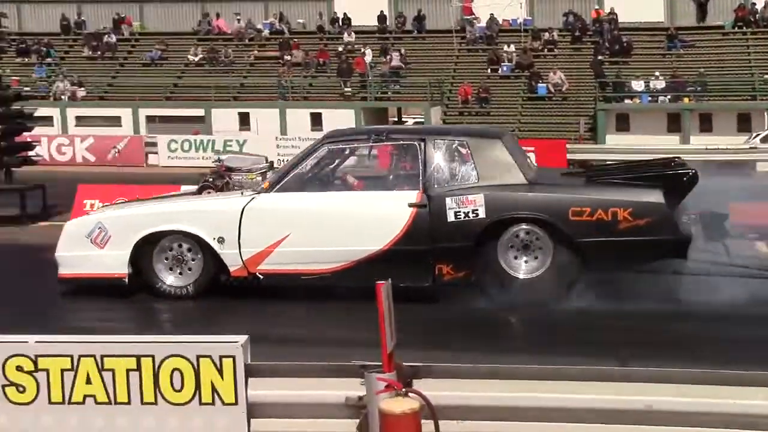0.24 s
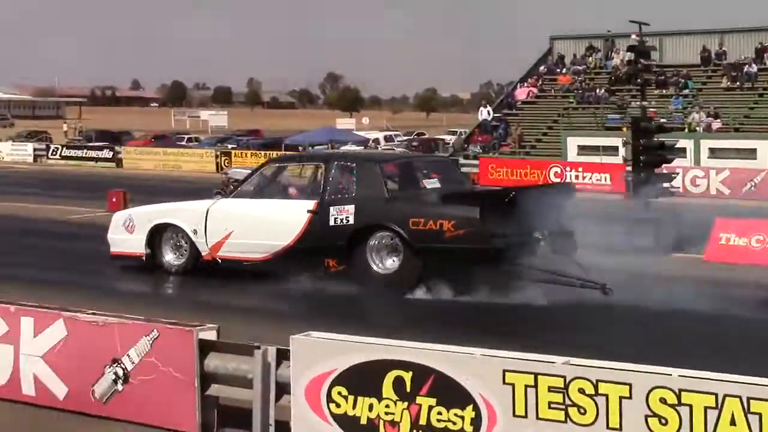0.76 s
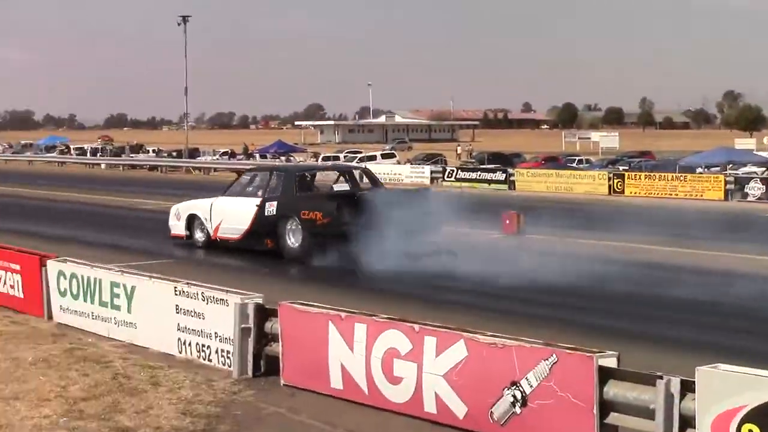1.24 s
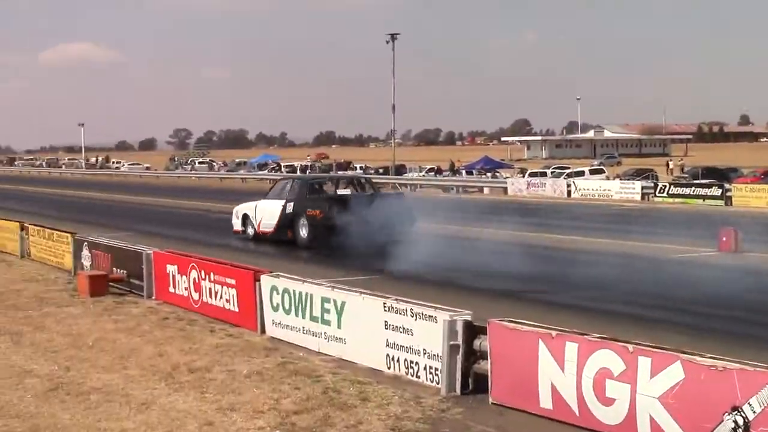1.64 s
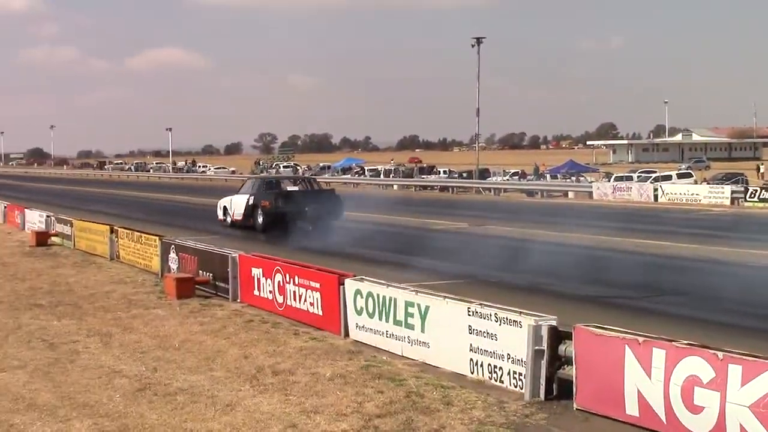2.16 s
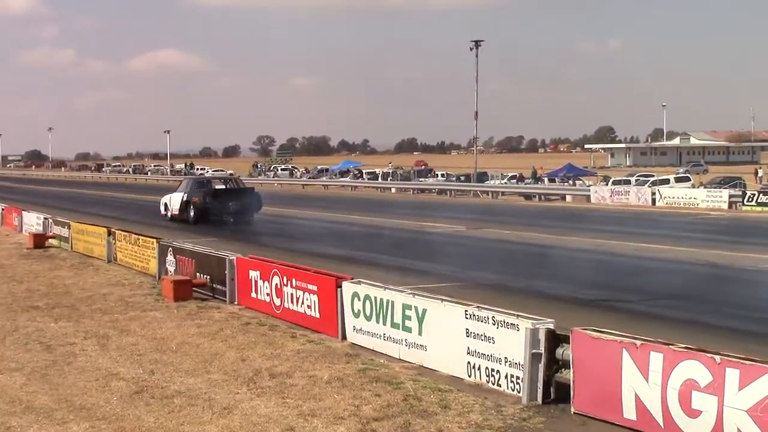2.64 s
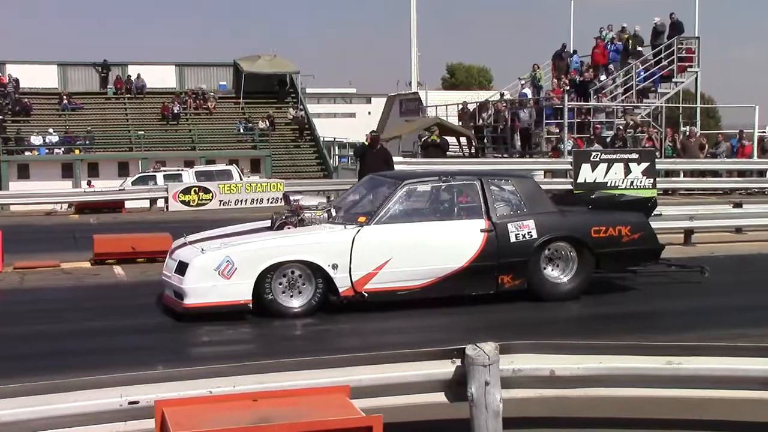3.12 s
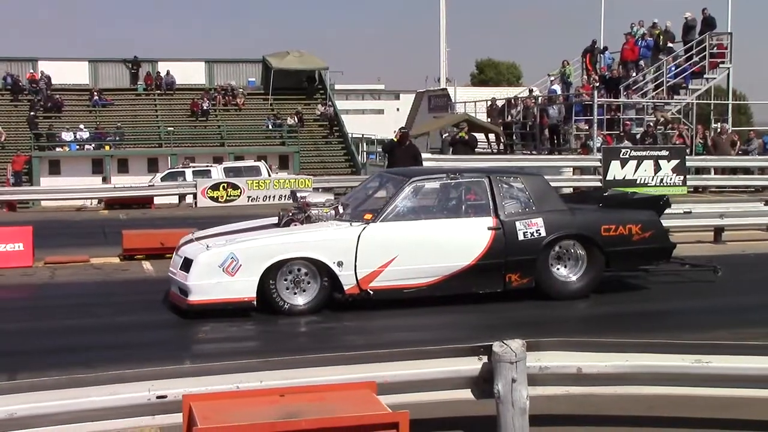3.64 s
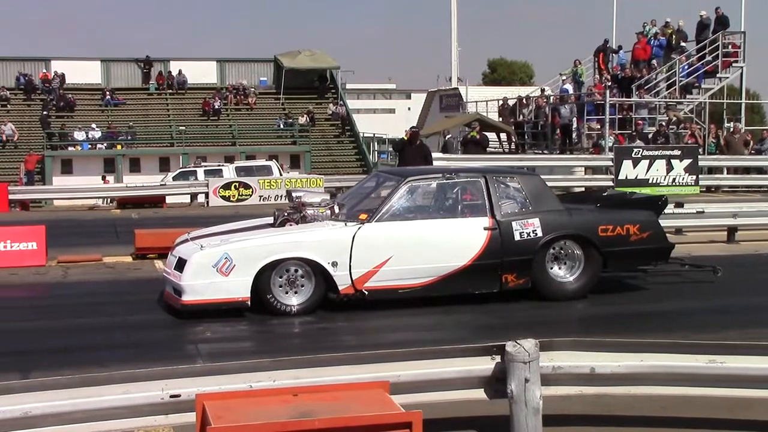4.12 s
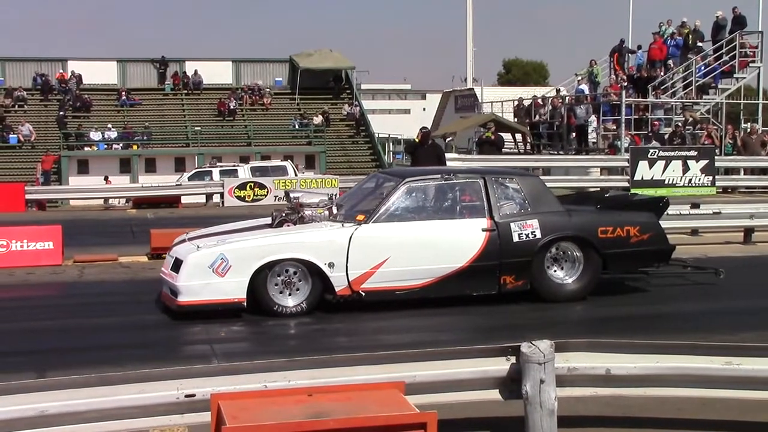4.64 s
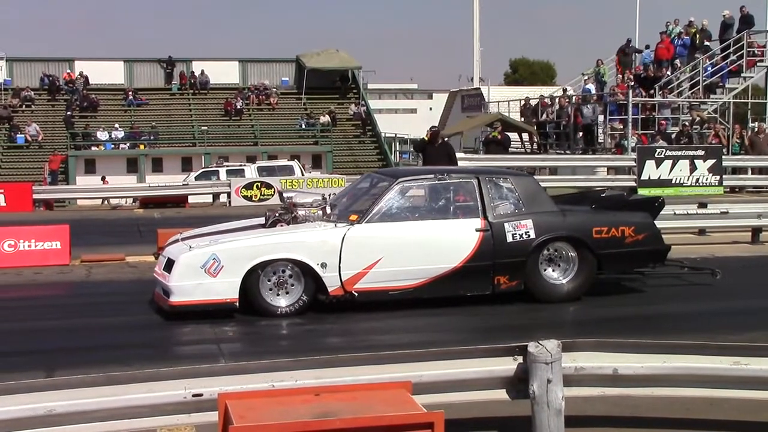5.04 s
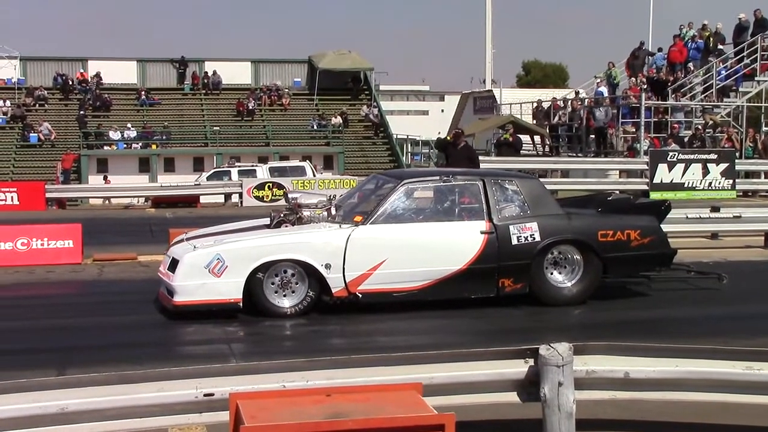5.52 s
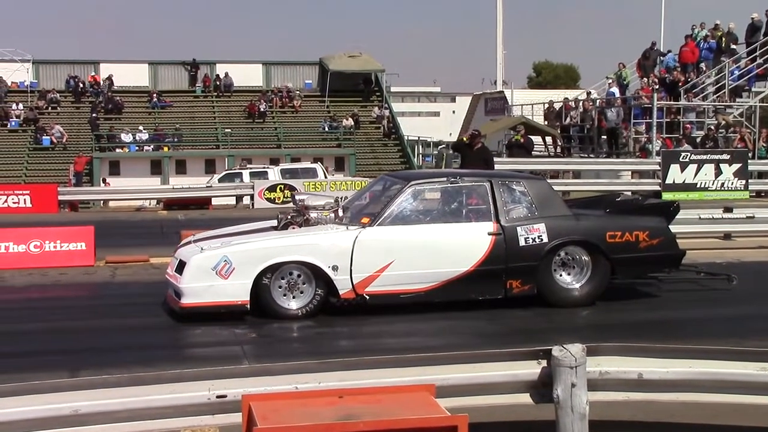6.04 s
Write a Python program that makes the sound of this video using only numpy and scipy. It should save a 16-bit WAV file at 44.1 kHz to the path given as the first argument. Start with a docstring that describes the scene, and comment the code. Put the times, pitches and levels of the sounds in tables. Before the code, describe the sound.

A racing engine at full throttle starts very close and loud, its pitch sagging slightly as it drives away. It lifts off; the echo dies quickly, leaving far-off crackles, two soft throttle swells and a slight rubber chirp. Then, suddenly near again, it idles roughly: rapid uneven barks and spits of gas over a low boom, valve clatter and whirr, with open-air reflections from the stands.

```python
"""Drag car: full-throttle run and loping idle

A V8 drag car with open headers spins its tyres past a trackside microphone, lifts off and crackles away.
Engine orders and coloured noise make the roar, gated bursts the pops, and gliding sines the tyre squeals.
At 3 s the scene cuts to the same car idling close by: each firing is a knock and a jet of hissing gas.
Decaying noise makes the diffuse answer of the barriers and the grandstand."""
import sys
import numpy as np
from scipy import signal
from scipy.fft import rfft, irfft, next_fast_len
from scipy.io import wavfile
from scipy.ndimage import map_coordinates

SR = 44100
rng = np.random.default_rng(int(sys.argv[2]) if len(sys.argv) > 2 else 0)


def store_wav(level_fs):
    """Save 16-bit WAV to argv[1]."""
    pcm = np.round(np.clip(np.atleast_2d(level_fs), -1, 1) * 32767)
    wavfile.write(sys.argv[1], SR, pcm.T.astype(np.int16))


N = 276948
TIME = np.arange(N) / SR
CUT_S = 3.004  # the run gives way to the idle
TOP_HZ = 16000  # band limit of the microphone
JET_HZ, PIPE_HZ = 8150, 1723  # centres of the gas jet's whistle and of a header pipe's ring
# the car is nearest at the start and drives away
NEAREST_M, CAR_M_PER_S = 6.56, 14.9
# the throttle shuts: when, how long it takes, and the time constant of the sinking revs
LIFT_S, SHUT_S, RUN_DOWN_S = .92, 0.043, 0.26
# places in the firing order of the cylinders that blow towards the listener, and of the two that tend to misfire
CYLINDERS, NEAR_BANK, FALTERING = 8, [0, 3, 5, 6], [3, 6]
# how hard the idling engine runs, before the trim of each layer:
# (time [s], hiss [dB], bark [dB], machinery [dB])
EFFORT = [(3.03, -17.5, -24.5, -29.5), (3.23, -14, -21.0, -27), (3.62, -17, -22.5, -28.5),
          (3.72, -15.5, -23, -29), (3.91, -19, -23.5, -30), (4.11, -17.5, -25.5, -31.5),
          (4.4, -19, -23.5, -26), (4.5, -17.5, -25.5, -29.9), (4.89, -16.2, -18, -25),
          (4.99, -16.5, -25.5, -27.5), (5.18, -17, -22.5, -32), (5.57, -18, -17.5, -25),
          (5.97, -16, -25, -30.5), (6.16, -18.5, -22.5, -27.5), (6.26, -17.5, -27, -26.5)]


def amp(db):
    """Level to amplitude ratio: 20 dB is a factor of ten."""
    return 10 ** (np.asarray(db) / 20)


def unit(x):
    """Normalise the mean power: scale to rms 1."""
    return x / np.sqrt(np.mean(x ** 2) + 1e-20)


def along(points, hz):
    """Interpolate (frequency [Hz], value) points on a logarithmic frequency axis, as pitch is heard."""
    f, v = np.transpose(points)
    return np.interp(np.log(hz + 1), np.log(f + 1), v)


def curves(rows):
    """Piecewise-linear motion: one value per sample for each column after the time."""
    s, *cols = np.transpose(rows)
    return [np.interp(TIME, s, c) for c in cols]


def wobble(rate):
    """Band-limited random fluctuation: a smooth curve through `rate` random knots a second."""
    knots = rng.standard_normal(int(N * rate / SR) + 4)
    return map_coordinates(knots, [TIME * rate])


def filtered(x, response):
    """Linear filtering: multiply the spectrum by a response of frequency."""
    m = next_fast_len(N + SR // 2)
    return irfft(rfft(x, m) * response(np.fft.rfftfreq(m, 1 / SR)), m)[..., :N]


def coloured(x, spectrum):
    """Spectral shaping: impose (frequency [Hz], relative level [dB]), falling away beyond its ends, at rms 1."""
    lo, hi = spectrum[0][0], spectrum[-1][0]

    def response(hz):
        skirts = np.minimum(hz / lo, 1) ** 2 / np.maximum(hz / hi, 1) ** 2
        return amp(along(spectrum, hz)) * skirts
    return unit(filtered(x, response))


def noise(spectrum, gate=1):
    """Turbulence as amplitude-modulated random noise, coloured, at rms 1."""
    return coloured(gate * rng.standard_normal(N), spectrum)


def strikes(s, sizes):
    """Impulsive excitation: one impulse of the given size at each time [s]."""
    samples = np.clip(np.round(s * SR), 0, N).astype(int)
    return np.bincount(samples, sizes, N + 1)[:N]


def stands(x, wet_db):
    """Diffuse reverberation: barriers and grandstand answer with noise that decays at each band's own rate."""
    # (frequency [Hz], time to decay by 60 dB [s])
    decay = [(100, 0.44), (600, 1), (3000, 0.77), (10000, 0.13)]
    hz, t, z = signal.stft(rng.standard_normal(SR), SR, nperseg=256)
    decaying = z * amp(-60 * t / along(decay, hz)[:, None])
    tail = signal.istft(decaying, SR, nperseg=256)[1]
    delayed = np.pad(x, (SR // 100, 0))
    return x + amp(wet_db) * signal.fftconvolve(delayed, tail / np.linalg.norm(tail))[:N]


def receding(near_db, distance_power, fade_db_per_s):
    """Spreading loss: the roar's gain falls as a power of distance, and dies away once the throttle shuts."""
    distance = np.hypot(NEAREST_M, CAR_M_PER_S * TIME) / NEAREST_M
    faded = near_db - fade_db_per_s * np.maximum(TIME - LIFT_S, 0)
    return amp(faded) / distance ** distance_power


def burnout(note_db=.5, shock_db=-4, echo_db=-4, surge_db=3, echo_db_per_s=78, run_down_db=-47, waver_db=2.1,
            flutter=.003, run_down_db_per_s=110):
    """Engine orders and shocks: an uneven beat sounds as low orders; blasts steepen into a crackling rasp."""
    # mean speed, a cycle being eight firings: (time [s], engine cycles per second [Hz])
    speed_points = [(0, 55.64), (0.18, 56.62), (0.26, 56.15), (0.45, 54.7), (0.53, 53.2), (0.72, 51.43),
                    (0.8, 51.07), (0.87, 48.9), (0.93, 48)]
    # exhaust note: (multiple of the cycle rate, relative level [dB])
    orders = [(3, -11), (4, -15.5), (5, -4), (6, -10), (7, -13), (8, 4.5), (9, -0.5), (10, -5), (11, 3.5),
              (12, -14.5), (13, 0), (14, -6), (15, 0.5), (16, -7), (17, -6), (18, -19), (19, -19.5),
              (21, -10), (22, -4), (30, -4), (33, -9)]
    # gas noise, lower and upper: (frequency [Hz], relative level [dB per Hz])
    rasp = [(30, -25), (80, -24), (150, -18), (260, -6), (450, 1), (750, 4), (1000, -0.5), (1400, 0),
            (1750, 2), (2400, 1), (3400, -1), (4500, -10.5), (7000, -19.5)]
    sizzle = [(2350, -20), (4000, -2.5), (5810, -3), (6520, 0), (8540, 1), (11900, -9), (13500, -17.5),
              (15100, -24), (15800, -23)]
    # the note, and the band that the ground bounce favours as the car passes:
    # (time [s], note before trim [dB], favoured frequency [Hz], lift [dB])
    aim = [(0, -26, 730, 9), (.2, -20.5, 740, 4.5), (.44, -21, 695.3, 7.5), (.58, -21, 530, 6),
           (.9, -24, 436, 3)]

    note, favoured_hz, lift = curves(aim)
    speed, = curves(speed_points)
    cycle = np.cumsum(speed * (1 + flutter * wobble(45))) / SR
    tone = np.zeros(N)
    for order, db in orders:
        phase = 2 * np.pi * order ** 2 / 3  # the orders bunch into three surges a cycle
        favour = np.exp(-(np.log(order * speed / favoured_hz) / 0.17) ** 2)
        level = db + lift * favour + waver_db * wobble(23.8)
        tone += amp(level) * np.cos(2 * np.pi * order * cycle + phase)

    # three surges and eight firings a cycle modulate the gas
    blast = amp(surge_db * np.cos(2 * np.pi * 3 * cycle) + 2 * np.cos(2 * np.pi * 8 * cycle))
    firings = np.interp(np.arange(int(cycle[-1] * 8)) / 8, cycle, TIME)
    chance = rng.standard_normal((len(firings), 2))
    impulses = strikes(firings + .0002 * chance[:, 0], amp(2.5 * chance[:, 1]))
    shocks = unit(impulses * blast)

    def gas(spectrum):
        turbulence = unit(blast * rng.standard_normal(N))
        return coloured(turbulence + amp(shock_db) * shocks, spectrum)
    roar = receding(near_db=-16, distance_power=1.0, fade_db_per_s=65) * gas(rasp)
    roar += receding(near_db=-18.0, distance_power=2.14, fade_db_per_s=115) * gas(sizzle)

    # the note stops when the throttle shuts; its smeared echo rolls on around the stands
    lifted = np.maximum(TIME - LIFT_S, 0)
    throttle = np.maximum(1 - lifted / SHUT_S, 0)
    diffuse = noise([(120, -28), (250, 4.5), (400, 0.5), (620, 5.5), (900, -4), (1400, -12)])
    smeared = 0.5 * unit(stands(tone, wet_db=18)) + 0.97 * diffuse
    echo = amp(note + echo_db - echo_db_per_s * lifted) * smeared
    # the lowest order slides down as the revs sink
    sinking_hz = orders[0][0] * speed * np.exp(-lifted / RUN_DOWN_S)
    sinking = np.sin(2 * np.pi * np.cumsum(sinking_hz) / SR)
    after = (1 - throttle) * (echo + amp(run_down_db - run_down_db_per_s * lifted) * sinking)
    return amp(note + note_db) * throttle * unit(tone) + roar + after


def blipped(lead_s=0):
    """Source modulation: each blip of throttle raises the level [dB] in a smooth Gaussian swell."""
    # blips while coasting: (time of the peak [s], rise [s], fall [s], swell before layer scaling [dB])
    blips = [(2.04, 0.22, 0.13, 16), (2.74, 0.14, .2, 11.5)]
    t = TIME + lead_s
    return sum(db * np.exp(-((t - s) / np.where(t < s, rise, fall)) ** 2) for s, rise, fall, db in blips)


def pops(rows, hiss_spectrum, whistle, hiss_db, bark_db, knock_db):
    """Pulsed outflow: a pressure wave leaves the pipe, then gas barks and hisses for some milliseconds."""
    # pressure wave, its ground bounce and the swing of the pipe: (delay [s], half width [s], relative level [dB])
    wave_parts = [(.00046, 0.00016, -1.5), (.00148, 0.00024, -5), (.0043, .00032, -9.5)]
    # bark: (frequency [Hz], relative level [dB per Hz])
    bark_spectrum = [(300, -34), (500, -5.5), (740, 8), (900, -9), (1060, 5.5), (1350, -8), (1750, 5),
                     (2400, -0.5), (3300, -0.5), (4300, -8.5), (6500, -2)]

    s, hiss, bark, knock = np.transpose(rows)
    t = np.arange(SR // 64) / SR
    samples = np.round(s[:, None] * SR).astype(int) + np.arange(len(t))
    at = np.minimum(samples, N - 1)
    chance = rng.standard_normal((len(s), 3))
    age = t / np.exp(0.21 * chance[:, :1])  # each burst runs at its own pace

    def sized(x, db):
        """Give each burst its energy, as rms over 5.5 ms."""
        return x * amp(db)[:, None] / np.sqrt(np.sum(x ** 2, 1, keepdims=True) / (0.0055 * SR))

    wave = np.zeros(len(t))
    for delay, width, db in wave_parts:
        offset = (t - delay) / width
        wave += amp(db) * offset * np.exp(-.5 * offset ** 2)
    bark_shape = amp(np.interp(age, [0, .0014, .0035, .0062, .009, .015], [-4.5, -10.5, 0, -5.5, -18.5, -44]))
    jet_shape = amp(np.interp(age, [.0005, .0019, .0055, .007, .009, .015], [-30, -3.5, -7, -15.0, -11.5, -54]))
    # the jet sings on a wandering note, different for every firing
    jet_hz = JET_HZ * np.exp(0.0625 * chance[:, 1:2] + 0.086 * wobble(1300)[at])
    singing = np.sin(2 * np.pi * np.cumsum(jet_hz, 1) / SR) * amp(6 * wobble(700)[at])
    jet = noise(hiss_spectrum)[at] + whistle * singing
    # the pipe rings at a pitch that depends on the heat of each charge
    ring_hz = PIPE_HZ * np.exp(0.197 * chance[:, 2:])
    body = noise(bark_spectrum)[at] + 0.67 * np.sin(2 * np.pi * ring_hz * t)
    sound = sized(jet * jet_shape, hiss + hiss_db)
    sound = sound + sized(body * bark_shape, bark + bark_db)
    sound = sound + sized(wave[None], knock + knock_db)
    return np.bincount(samples.ravel(), sound.ravel(), N)[:N]


def coasting(rumble_db=-65, exhaust_db=-57, fizz_db=-73, rumble_grows=0.55, fizz_grows=1.34, fizz_lead_s=0.058,
             grain_db=4.0, rate_hz=88, drone_db=-60):
    """Modulated noise and pulses: a distant burble swells with each blip, with pops and a late drone."""
    # distant layers: (frequency [Hz], relative level [dB per Hz])
    rumble_spectrum = [(25, -27), (65, -24), (90, -12), (130, 0), (230, 4), (350, -3), (550, 9), (900, -28)]
    exhaust_spectrum = [(300, -21), (500, -12), (700, 2), (900, 0), (1150, 6), (1600, -3), (2100, -3.5),
                        (3100, -5), (4500, -13.5), (6500, -16.5)]
    fizz_spectrum = [(2500, -7.5), (4000, -3), (5500, -12.5), (7500, -1), (9500, 1), (11500, -6.5),
                     (13500, -20), (15500, -34)]
    # overrun pops, before trim: (time [s], hiss [dB], bark and knock [dB])
    overrun = [(1.6354, -44.5, -60), (1.7265, -45, -42.5), (1.7447, -43, -45), (1.7794, -46, -46),
               (1.82, -38.5, -39), (1.848, -39, -39), (1.86, -40, -42), (1.883, -41, -49),
               (2.0726, -43, -34.5), (2.2411, -54, -56), (2.335, -51.5, -61), (2.4143, -52, -65),
               (2.459, -45, -42), (2.4731, -41.5, -48), (2.593, -52.2, -43.5), (2.6723, -60, -44),
               (2.7658, -57, -39), (2.8574, -54, -44.5), (2.9348, -46, -40)]

    swell = blipped()
    rumble, exhaust = rumble_db + rumble_grows * swell, exhaust_db + swell
    fizz = fizz_db + fizz_grows * blipped(fizz_lead_s)
    burble = amp(grain_db * wobble(170))
    bed = amp(rumble) * noise(rumble_spectrum)
    bed += amp(exhaust) * noise(exhaust_spectrum, burble)
    bed += amp(fizz) * noise(fizz_spectrum, burble)
    drone_shape = np.interp(TIME, [2.68, 2.87, 3], [0, 1, .6])
    drone = amp(drone_db) * drone_shape * np.sin(2 * np.pi * rate_hz * TIME)

    # soft pops at the firing rate, with scattered times and levels
    chance = rng.standard_normal((130, 2))
    times = 1.6 + (np.arange(len(chance)) + 0.206 * chance[:, 0]) / rate_hz
    hiss, bark = [np.interp(times, TIME, db) + 3.9 * chance[:, 1] for db in (fizz, exhaust)]
    soft = pops(np.transpose([times, hiss, bark, bark]), fizz_spectrum,
                whistle=.2, hiss_db=1, bark_db=-5.0, knock_db=-10.0)
    loud = pops([(s, hiss, bark, bark) for s, hiss, bark in overrun], fizz_spectrum,
                whistle=.2, hiss_db=-1.0, bark_db=-2.0, knock_db=-8.5)
    return np.interp(TIME, [1.1, 1.25], [0, 1]) * (bed + drone) + soft + loud


def tyres(level_db=-3, overtone_db=-4):
    """Stick-slip: rubber squeals faintly on a wavering note and its octave as the tyres grip again."""
    # one table per squeal: (time [s], centre frequency [Hz], level before trim [dB])
    squeals = [
        [(1.5, 620, -64), (1.6, 630, -58), (1.65, 730, -56), (1.7, 820, -55), (1.78, 870, -66)],
        [(1.7, 720, -67), (1.78, 690, -54), (1.9, 660, -58), (2.02, 660, -52)],
    ]
    sound = np.zeros(N)
    for rows in squeals:
        hz, db = curves(rows)
        sounding = (TIME > rows[0][0]) & (TIME < rows[-1][0])
        slipping = hz * (1 + .03 * wobble(230))
        phase = 2 * np.pi * np.cumsum(slipping) / SR
        gain = sounding * amp(db + level_db + 4.7 * wobble(50.14))
        sound += gain * (np.sin(phase) + amp(overtone_db) * np.sin(2 * phase))
    return sound


def firing_times(places):
    """Crank kinematics: places in the firing order become firing times [s] at idle, in order."""
    # the idle hunts around 11.5 cycles a second: (time [s], engine cycles completed)
    crank = [(2.9864, 0), (3.2596, 3), (3.5161, 6), (3.7803, 9), (4.0329, 12), (4.2166, 14), (4.3032, 15),
             (4.4679, 17), (4.6426, 19), (4.7355, 20), (4.9097, 22), (5.0767, 24), (5.2573, 26),
             (5.5222, 29), (5.8587, 33), (6.0412, 35), (6.2941, 38)]
    s, cycles = np.transpose(crank)
    turns = np.arange(cycles[-1])[:, None] + np.array(places) / CYLINDERS
    return np.interp(turns.ravel(), cycles, s)


def near_firings(scatter_db=0.82, bark_scatter_db=1.84, knock_scatter_db=3.5, bark_loses=1.8, knock_loses=1.0):
    """Uneven combustion: the near bank limps, weak where a charge burns poorly; rows as pops() takes."""
    # near cylinders in firing order: (hiss re effort [dB], bark re effort [dB], knock before trim [dB])
    voices = [(2, 2.5, -21.5), (0.5, -3, -20.5), (1.84, 0.1, -20), (-5, -2.5, -22.5)]
    # poor burns, each given to the nearest faltering firing: (time [s], change of hiss level [dB])
    misfires = [(3.05, -8), (3.11, -6), (3.32, -15), (3.38, -2.5), (3.46, -14), (3.58, -7), (3.76, -8),
                (3.81, -5), (3.9, -5), (3.93, -3.5), (3.98, -10), (4.01, -8), (4.1, -10), (4.16, -26.5),
                (4.28, -7), (4.42, -3), (4.45, -12), (4.5, -5.5), (4.68, -4), (4.71, -17), (4.86, -5.5),
                (5.11, -2.5), (5.14, -17), (5.2, -12), (5.41, -3), (5.47, -2), (5.5, -21), (5.75, -10),
                (5.81, -4), (5.93, -22), (5.98, -12), (6.24, -8)]
    times, faltering = firing_times(NEAR_BANK), firing_times(FALTERING)
    lost = np.zeros(len(times))
    for s, db in misfires:
        nearest = faltering[np.argmin(np.abs(faltering - s))]
        lost[times == nearest] = db
    hiss, bark, _ = [np.interp(times, TIME, c) for c in curves(EFFORT)]
    own_hiss, own_bark, knock = np.resize(voices, (len(times), len(voices[0]))).T
    chance = rng.standard_normal((len(times), 3))
    return np.transpose([times, hiss + own_hiss + lost + scatter_db * chance[:, 0],
                         bark + own_bark + bark_loses * lost + bark_scatter_db * chance[:, 1],
                         knock + knock_loses * lost + knock_scatter_db * chance[:, 2]])


def far_firings(scatter_db=3.0):
    """Screening: the car's body hides the far bank, which fires softly in the gaps; rows as pops() takes."""
    times = firing_times([place for place in range(CYLINDERS) if place not in NEAR_BANK])
    machinery = curves(EFFORT)[-1]
    level = np.interp(times, TIME, machinery) + scatter_db * rng.standard_normal(len(times))
    return np.transpose([times, level, level, level])


def idling(clatter_db=-4, whirr_db=-6.0, boom_db=-42, grain_db=3.0):
    """Pulse-driven resonance: uneven firings boom in the exhaust over valve clatter and belt-drive whirr."""
    # gas jet, valves and belt drive: (frequency [Hz], relative level [dB per Hz])
    hiss_spectrum = [(2000, -18), (3500, -5), (5000, -4.5), (6000, -3), (7000, 2.5), (8200, -0.5),
                     (10000, -2), (12000, -6.5), (13500, -13), (15800, -21)]
    clatter_spectrum = [(25, -44), (65, -51), (90, -15), (130, -1), (240, 1.5), (350, -8.5), (450, 0.5),
                        (620, 2), (780, 3), (1300, -3), (1750, -1), (2300, -1.5), (3100, -1), (5000, -14.5)]
    whirr_spectrum = [(3000, -19.5), (5000, -21), (6500, -2), (7600, 5.5), (9000, 4.5), (11000, 2),
                      (13000, -10), (15800, -20)]
    # low exhaust resonances: (frequency [Hz], width [Hz], relative level [dB])
    resonances = [(96.5, 8.3, 3), (133, 19, 4.5), (169, 53, -3.5), (225, 29, 13), (312, 28.5, 14.5),
                  (400, 19, 0.5)]

    running = curves(EFFORT)[-1]
    near, far = near_firings(), far_firings()
    strong = pops(near, hiss_spectrum, whistle=0.81, hiss_db=1, bark_db=2.5, knock_db=-5.5)
    soft = pops(far, whirr_spectrum, whistle=0.47, hiss_db=-14.0, bark_db=-11.0, knock_db=-30)
    s, _, _, knock = np.vstack([near, far]).T

    def pipe(f):
        modes = sum(amp(db) * 1j * f * w / (hz * hz - f * f + 1j * f * w) for hz, w, db in resonances)
        return modes / (1 + (75 / (f + 1)) ** 8)  # little sounds below 75 Hz
    depth = np.interp(TIME, [3.5, 4.1], [3, -1])  # the boom eases as the car creeps forward
    boom = amp(boom_db + depth) * unit(filtered(strikes(s, amp(knock)), pipe))
    rattle = amp(grain_db * wobble(370))
    clatter = amp(clatter_db) * noise(clatter_spectrum, rattle)
    whirr = amp(whirr_db) * noise(whirr_spectrum, rattle)
    return strong + soft + boom + amp(running) * (clatter + whirr)


def scene():
    """Superposition and decorrelation: the run, a cut, then the idle; mainly the treble has width."""
    # stereo spread: (frequency [Hz], side re mid [dB])
    spread = [(2000, -109), (4000, -38.5), (8000, -18.5), (15000, -25.5)]
    run = stands(burnout(), wet_db=-21) + stands(coasting() + tyres(), wet_db=-15)
    idle = stands(idling(), wet_db=-16)
    mid = np.where(TIME < CUT_S, run, idle)
    scatter = rng.standard_normal(SR // 200)
    side = np.convolve(mid, scatter / np.linalg.norm(scatter), "same")
    side = filtered(side, lambda hz: amp(along(spread, hz)))
    return np.array([mid + side, mid - side])


def record(dry):
    """Saturation and band limiting: the microphone rounds the highest peaks, thins the bass, stops at TOP_HZ."""
    # bass cut: (frequency [Hz], gain [dB])
    bass_cut = [(30, -11.5), (62, -13.5), (90, -8), (125, -0.5)]
    rounded = dry / (1 + np.abs(dry / .85) ** 6) ** (1 / 6)
    thinned = filtered(rounded, lambda hz: amp(along(bass_cut, hz)))
    return filtered(thinned, lambda hz: hz < TOP_HZ)


dry = scene()
out = record(dry)
store_wav(out)
```